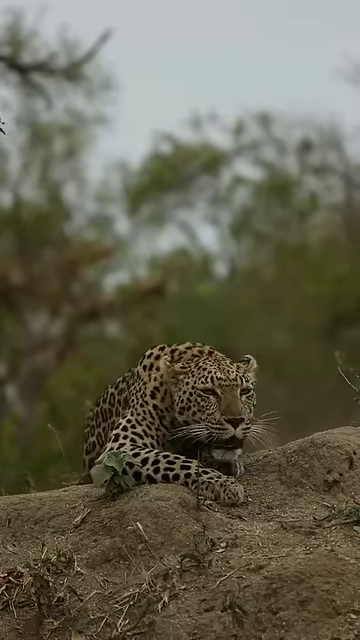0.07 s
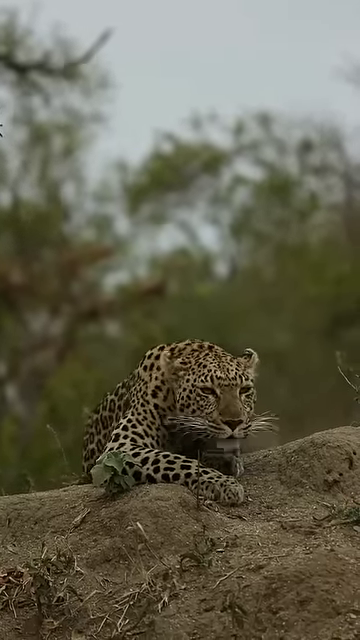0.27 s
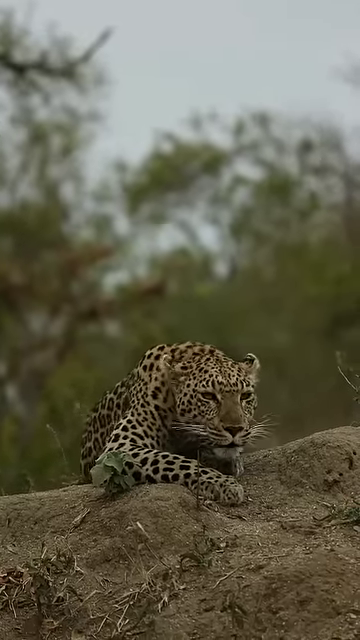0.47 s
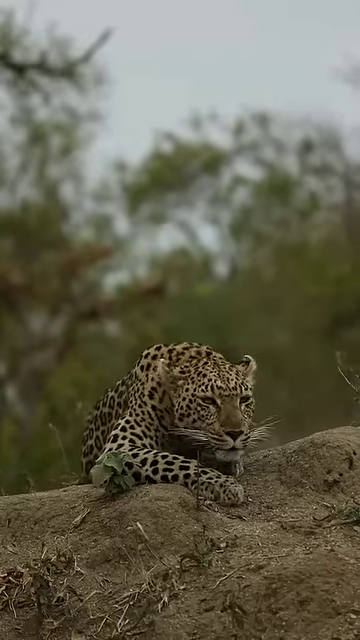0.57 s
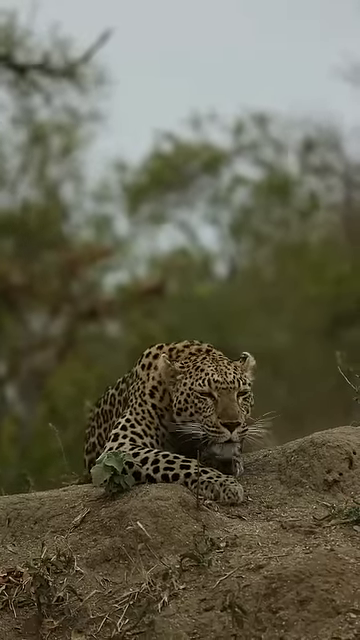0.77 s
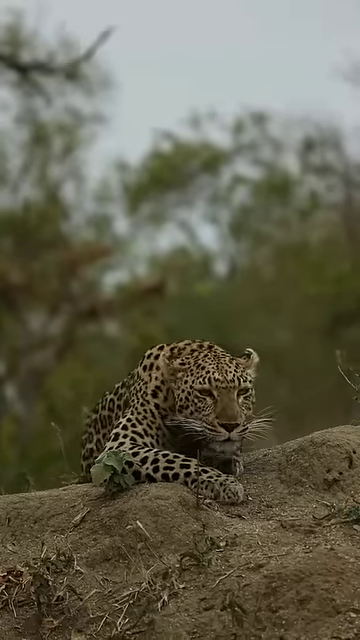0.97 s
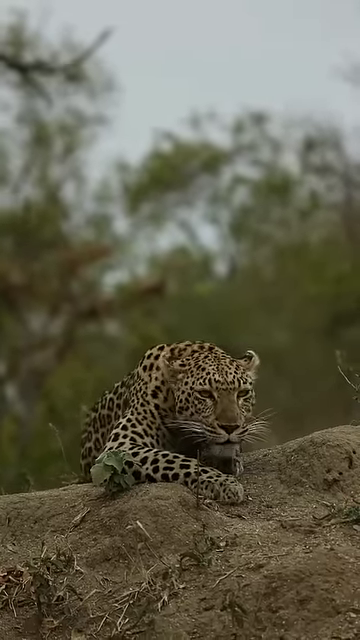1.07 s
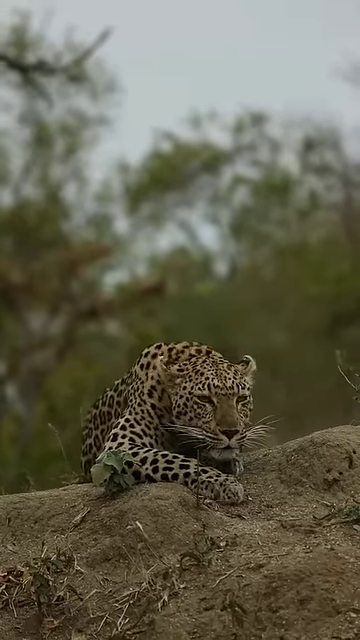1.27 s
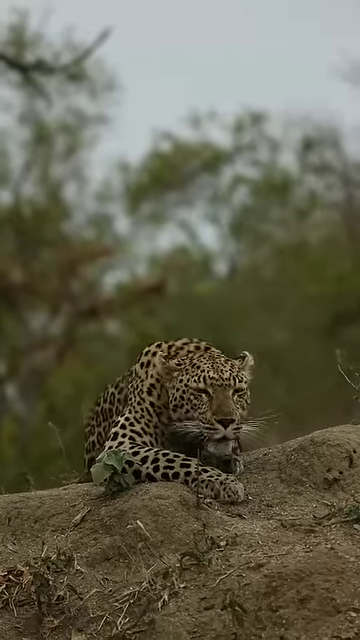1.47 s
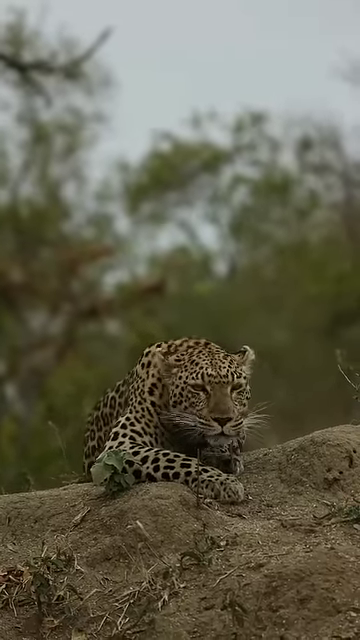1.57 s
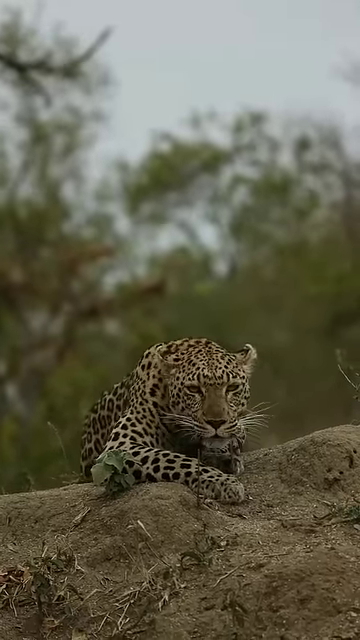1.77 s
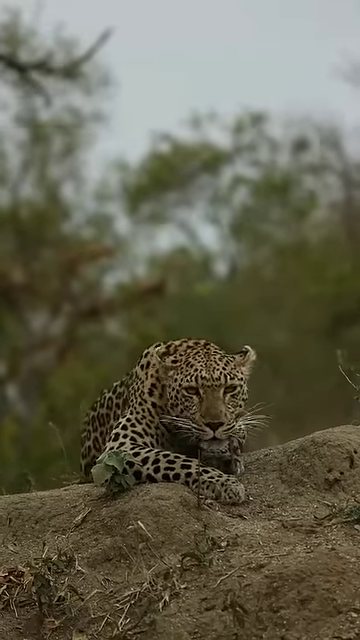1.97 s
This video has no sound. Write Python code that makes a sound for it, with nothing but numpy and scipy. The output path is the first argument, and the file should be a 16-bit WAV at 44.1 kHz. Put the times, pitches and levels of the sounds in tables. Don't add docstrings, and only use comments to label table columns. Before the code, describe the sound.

Close, dry outdoor sound of a leopard sawing: short grunt, coarse throaty out-breath, three times over. A sharp twig snap follows the first call, soft shutter strokes come after the second, over low air hiss and slight wind.

```python
import sys
import numpy as np
from scipy import signal
from scipy.fft import rfft, irfft, next_fast_len
from scipy.io import wavfile
from scipy.ndimage import uniform_filter1d, map_coordinates

SR = 44100
rng = np.random.default_rng(int(sys.argv[2]) if len(sys.argv) > 2 else 0)


def voltage_ratio(level):
    return 10 ** (np.asarray(level, float) / 20)


def digitize_waveform(pressure):
    field = np.atleast_2d(pressure).T
    bounded = np.clip(field, -1, 1)
    quanta = np.round(bounded * 32767).astype(np.int16)
    wavfile.write(sys.argv[1], SR, quanta)


N = 88200


def unit(x):
    return x / np.sqrt(np.mean(np.abs(x) ** 2) + 1e-20)


def along(points, hz):
    f, v = np.transpose(points)
    return np.interp(np.log(hz + 1), np.log(f + 1), v)


def filtered(x, response):
    m = next_fast_len(N + SR // 2)
    return irfft(rfft(x, m) * response(np.fft.rfftfreq(m, 1 / SR)), m)[..., :N]


def two_pole(f, time_s):
    return 1 / (1 + 2j * np.pi * f * time_s) ** 2


def wobble(rate):
    knots = rng.standard_normal(int(N * rate / SR) + 4)
    return map_coordinates(knots, [np.arange(N) * rate / SR])


def steady(x):
    return x / np.sqrt(np.abs(uniform_filter1d(x ** 2, round(0.035 * SR))) + 1e-3)


def patchy(x, patchy_db):
    z = signal.stft(x, nperseg=512)[2]
    field = uniform_filter1d(rng.standard_normal(z.shape[-2:]), size=5, axis=0)
    field = uniform_filter1d(field, size=5, axis=1)
    return signal.istft(z * voltage_ratio(patchy_db * unit(field)), nperseg=512)[1][..., :N]


def resonance(x, hz, width_hz):
    turn = np.exp(2j * np.pi * np.cumsum(hz * np.ones(N)) / SR)
    pole = np.exp(-np.pi * abs(width_hz) / SR)
    smooth = signal.lfilter([1], [1, -2 * pole, pole ** 2], x / turn)
    return unit(np.real(turn * smooth))


def hiss(spectrum, alike, patchy_db):
    pair = patchy(rng.standard_normal((2, N)), patchy_db)

    def mid_side(hz):
        turn = np.arccos(np.clip(along(alike, hz), -1, 1)) / 2
        return voltage_ratio(along(spectrum, hz)) * [np.cos(turn), np.sin(turn)]

    mid, side = filtered(pair, mid_side)
    return unit(np.array([mid + side, mid - side]))


def air():
    # f/Hz, level/dB
    spectrum = [(30, -5), (100, 3.5), (250, 2.5), (500, 3), (850, -2), (1300, -9.5), (4000, -18.5),
                (15700, -28)]
    # f/Hz, left-right likeness
    likeness = [(100, 0.97), (700, 0.79), (2000, 0.13), (10000, 0.051)]
    # t/s, half length/s, level/dB
    wind_puffs = [
        (1.045, 0.014, -38),
        (1.084, 0.029, -31),
        (1.383, 0.052, -47),
        (1.45, 0.039, -38),
        (0.044, 0.17, -44.5),
        (.7, 0.031, -61),
        (1.799, 0.018, -44),
        (1.94, 0.028, -65),
    ]
    t = np.arange(N) / SR
    swell = sum(voltage_ratio(db) * np.exp(-((t - s) / half_s) ** 2) for s, half_s, db in wind_puffs)
    white = rng.standard_normal((2, N))
    rumble = unit(filtered(white, lambda f: f ** 2 / (1 + (f / 83) ** 5)))
    level = voltage_ratio(-46 + 1.1 * wobble(6.05))
    return level * hiss(spectrum, likeness, patchy_db=0.4) + swell * rumble


def fold_slaps(rate, slap_s):
    jitter_cycles, scatter_db = 0.04065, 4
    cycles = np.cumsum(rate) / SR
    cycles = cycles - np.interp(slap_s, np.arange(N) / SR, cycles)
    chance = rng.standard_normal((200, 2))
    due = np.arange(-100, 100) + jitter_cycles * chance[:, 0]
    at = np.interp(due, cycles, np.arange(N), left=N, right=N).astype(int)
    return np.bincount(at, voltage_ratio(scatter_db * chance[:, 1]), N + 1)[:N], cycles


def mouth_rasp(slaps, puffs):
    # f/Hz, width/Hz, level/dB
    upper_modes = [(1250, 400, -7), (1570, 150, -5), (1850, 400, -7), (2290, 400, -8), (2780, 300, -9),
                   (3350, 450, -8), (4000, 700, -16), (4750, 500, -15), (5400, 600, -15), (6050, 600, -14),
                   (7000, 900, -22), (8200, 1000, -19), (9300, 800, -26), (12800, 2500, -33)]
    breath_share, sway_depth = 0.77, 0.06

    def mouth(f):
        return sum((-1) ** k * voltage_ratio(db) * 1j * f * w / (c * c - f * f + 1j * f * w)
                   for k, (c, w, db) in enumerate(upper_modes))

    sharp = unit(filtered(slaps, lambda f: 1j * f * (f < 5000)))
    rasp = patchy((1 - breath_share) * sharp + breath_share * puffs, patchy_db=2.5)
    sway = np.clip(wobble(35), -1, 1)
    swaying = 0
    for k in (-1, 0, 1):
        shaped = filtered(rasp, lambda f: mouth(f * (1 + k * sway_depth)))
        swaying = swaying + np.maximum(1 - np.abs(sway - k), 0) * shaped
    return steady(unit(swaying))


def breath(rows, slap_s, width_hz, upper_db, rise_db, nose_db):
    t = np.arange(N) / SR
    s, *cols = np.transpose(rows)
    effort_db, first_hz, rate = [np.interp(t, s, c) for c in cols]
    effort_db = effort_db - 600 * np.maximum(np.maximum(s[0] - t, t - s[-1]), 0)
    over_db = effort_db + 8.5
    late_s = t - s.mean()

    impulses, cycles = fold_slaps(rate, slap_s)
    gate = unit(filtered(impulses, lambda f: two_pole(f, 0.0071))) + 0.3
    rasp_gate = 0.9 + unit(filtered(impulses, lambda f: two_pole(f, 0.0038)))
    puffs = unit(rng.standard_normal(N) * rasp_gate)
    noise = [unit(gate * n) for n in rng.standard_normal((3, N))]
    slaps = unit(filtered(impulses, lambda f: 1j * f * two_pole(f, 0.0018)))

    def ring(hz, width, share, n):
        return steady((1 - share) * resonance(slaps, hz, width) + share * resonance(n, hz, width))

    from_slap = np.minimum(cycles % 1, 1 - cycles % 1)
    depth = np.clip(0.45 + 0.6 * wobble(40.17), 0, 1)
    leak = 1 - depth * np.exp(-(from_slap / 0.16) ** 2)
    low = steady(leak * ring(first_hz, width_hz, 0.3, noise[0]))
    low = low + voltage_ratio(-13.5) * ring(104, 29.6, 0.34, noise[0])
    low = low + voltage_ratio(nose_db) * ring(1720, 600, 0.62, noise[2])
    low = low + voltage_ratio(-27) * ring(399, 130, 0.44, noise[2])

    second_hz = 708 + 0.93 * (first_hz - 200) + 40 * wobble(30.95)
    second = ring(second_hz, 90, 0.6, noise[1])
    second = second + voltage_ratio(0.5) * ring(710 + first_hz - 200, 200, 0.6, noise[0])
    second_db = -13.5 - 12.0 + 1.68 * over_db - 8 * late_s + 1.83 * wobble(34.97)
    third = ring(1133.7, 44, 0.62, noise[2])
    third_db = -39 + 1.6 * over_db

    tongue_db = -9 + 4 * wobble(60.2)
    tongue = ring(2767 + 70 * wobble(29.7), 190, 0.68, noise[1])
    upper = mouth_rasp(slaps, puffs) + voltage_ratio(tongue_db) * tongue
    upper_db = upper_db - 11.0 + 0.94 * over_db + rise_db * late_s + 1.67 * wobble(24.46)
    return voltage_ratio(effort_db) * low + voltage_ratio(second_db) * second + voltage_ratio(third_db) * third + voltage_ratio(upper_db) * upper


def smacks():
    # t/s, peak level/dB, f/Hz
    wet_smacks = [(0.204, -22.5, 1690), (0.225, -26, 1600), (.228, -29, 3250), (0.036, -35, 2820),
                  (.264, -20.5, 2760), (.284, -27, 3140), (.302, -24, 2820), (.321, -16.5, 2790),
                  (.343, -28, 2720), (.345, -38, 4900), (0.881, -30, 3000), (.883, -29.5, 5810),
                  (0.901, -36, 3120), (0.962, -29, 2750), (0.999, -33, 2700), (1.08, -33, 2780),
                  (1.57, -32.5, 5570), (1.589, -29.5, 2370), (1.608, -32, 3490), (1.650, -23, 2650),
                  (1.651, -37, 5830), (1.673, -20, 2826), (1.697, -30.5, 4820), (1.738, -29, 2880),
                  (1.758, -36.5, 2840), (1.78, -39, 2840), (1.801, -41.5, 2860)]
    t60_s, rise_s, spread_share = 0.018, 0.0014, 0.07
    out, t = np.zeros(N), np.arange(1500) / SR
    chance = rng.standard_normal((len(wet_smacks), 2, 3, 1))
    for (s, db, hz), (spread, phase) in zip(wet_smacks, chance):
        ring = np.sin(2 * np.pi * hz * (1 + spread_share * spread) * t + 2 * phase).sum(axis=0)
        decay = voltage_ratio(db - 3.5 - 60 * t / t60_s)
        out[round(s * SR):][:1500] += decay * (1 - np.exp(-t / rise_s)) * ring
    return out


def leopard():
    # t/s, effort level/dB, lowest throat resonance f/Hz, fold slaps per s
    gasps = [
        [(0.0, -27, 170, 64), (0.056, -24.5, 161, 65.4), (0.07, -35, 148, 60), (0.1, -45.5, 173, 68)],
        [(0.62, -46, 174, 60), (0.654, -26, 169, 56.7), (0.682, -21.5, 150, 57.3), (0.77, -49.5, 158, 61)],
        [(1.31, -50, 156, 60), (1.322, -31.5, 159, 60), (1.372, -24, 149, 60), (1.44, -49, 164, 57)],
    ]
    # t/s, effort level/dB, lowest throat resonance f/Hz, fold slaps per s
    saws = [
        [(.141, -49, 149, 48.2), (.179, -26, 157, 47.6), (.201, -12, 170.5, 49.2), (.225, -6.5, 184, 50.4),
         (.273, -9, 256, 49.9), (.311, -8.5, 208.3, 48), (.361, -11.5, 177.4, 47), (.411, -23, 159, 44.5),
         (.481, -47.5, 156, 43)],
        [(.801, -51, 151, 45.2), (.839, -23, 143.5, 42.8), (.887, -5.5, 181, 52), (.926, -9.5, 240, 56.4),
         (.961, -8, 214.6, 51.2), (1.006, -10.5, 177.4, 38.6), (1.041, -19, 154.4, 51),
         (1.096, -25.5, 163.6, 46), (1.126, -70, 152, 59)],
        [(1.511, -75, 150, 40), (1.536, -24, 167, 43.6), (1.566, -15.5, 156.3, 47.2),
         (1.589, -9.5, 207.7, 51.5), (1.641, -7, 199.5, 49), (1.716, -12.5, 169, 38.8),
         (1.749, -21.5, 152, 39.8), (1.811, -31, 149.7, 38.7), (1.856, -69, 148, 66)],
    ]
    # f/Hz, left-right level/dB
    lean = [(60, 2), (200, -0.2), (700, -1.5), (1300, -3.5), (2400, -15.5), (4400, -0.5), (8000, -5),
            (15000, 1.5)]
    # f/Hz, left-right phase/rad
    lead = [(200, -.15), (700, -.25), (1300, -1.3), (2600, -1.4), (5000, -1.7), (9000, -.9), (14000, -1)]
    # f/Hz, T60/s
    bush_t60 = [(150, .2), (1000, .12), (2500, .07), (6000, .065)]
    # f/Hz, level/dB
    bush_db = [(150, -27.5), (800, -19), (2500, -3.5), (5000, 5), (10000, 4.5)]

    first_slap_s = (0.161, 0.822, 1.522, 0.0029, 0.631, 1)
    width_hz = (40, 40, 40, 114, 114, 114)
    upper_db = (-26, -28.5, -29, -28, -34.5, -39)
    rise_db = (8, -9, 1.5, -27, -3, -8)
    nose_db = (-60, -60, -60, -21, -32.5, -28)
    breaths = zip(saws + gasps, first_slap_s, width_hz, upper_db, rise_db, nose_db)
    voice = sum(breath(*b) for b in breaths) + smacks()
    voice = filtered(voice, lambda f: (1j * f / (77.3 + 1j * f)) ** 2)

    def ports(f):
        half = voltage_ratio(along(lean, f) / 2) * np.exp(0.5j * along(lead, f))
        return np.array([half, 1 / half])

    hz, t, z = signal.stft(rng.standard_normal((2, SR // 3)), SR, nperseg=256)
    decay = voltage_ratio(-60 * t / along(bush_t60, hz)[:, None])
    tail = signal.istft(z * decay, SR, nperseg=256)[1]
    wet = signal.fftconvolve(voice[None], tail / np.linalg.norm(tail[0]), axes=1)[:, :N]
    wet = filtered(wet, lambda f: voltage_ratio(along(bush_db, f)) * np.abs(ports(f)))
    return filtered(voice, ports) + wet


def ticks():
    # t/s, peak level/dB, f/Hz, left-right level/dB
    tick_rows = [(0.3752, -20, 3450, -13), (0.377, -8.5, 2670, -4.5), (.378, -26.5, 3900, -2),
                 (.4475, -23, 4270, -5.5), (.447, -27, 2040, 16), (.448, -33.5, 6300, 0),
                 (0.447, -40.5, 8500, -2), (.448, -33.5, 1300, -0.5), (.448, -36.5, 3100, 0),
                 (1.118, -47, 3900, -6), (1.206, -40.5, 4330, -12), (1.287, -38, 3450, -4),
                 (1.313, -40.5, 2830, -1), (1.324, -33.5, 5000, 4.5), (1.325, -35.5, 6500, 0),
                 (.713, -41.5, 700, 0), (1.8, -36.5, 900, -1)]
    t60_s, rise_s, snap_db, snap_t60_s = 0.01, 0.0006, -19, 0.005
    out, t = np.zeros((2, N)), np.arange(900) / SR
    port_phase = np.array([[0], [2.2]])
    for s, db, hz, pan_db in tick_rows:
        ring = np.sin(2 * np.pi * hz * t + port_phase) * voltage_ratio(-60 * t / t60_s) * (1 - np.exp(-t / rise_s))
        snap = voltage_ratio(snap_db - 60 * t / snap_t60_s) * np.diff(rng.standard_normal((2, 901)))
        level = voltage_ratio(db + np.array([[pan_db], [-pan_db]]) / 2)
        out[:, round(s * SR):][:, :900] += level * (ring + snap)
    return out


def shutter():
    # t/s, level/dB, length/s
    stroke_rows = [
        (1.108, -49.5, 0.052),
        (1.192, -49.5, 0.071),
        (1.277, -45.5, 0.081),
    ]
    # f/Hz, level/dB
    tone = [(210, -48), (350, -10), (1040, 3), (2070, -3.5), (3020, -18), (4260, -16.5), (9970, -29),
            (15000, -32)]
    whirr_on_s, whirr_off_s = 1.04, 1.41
    t = np.arange(N) / SR

    def clack(s, db):
        return voltage_ratio(db - 60 * np.maximum(t - s, 0) / 0.024) * np.clip((t - s) / 0.0058, 0, 1)

    strokes = 0
    for s, db, long_s in stroke_rows:
        run = np.clip(np.minimum(t - s, s + long_s - t) / 0.008, 0, 1)
        latch = clack(s + 0.0079, 17.5)
        stop = clack(s + long_s - 0.016, 12)
        strokes = strokes + voltage_ratio(db) * (run + clack(s, 14.5) + latch + stop)
    whirr = voltage_ratio(-54) * np.clip(np.minimum(t - whirr_on_s, whirr_off_s - t) / 0.025, 0, 1)
    rattle = voltage_ratio(1.3 * wobble(70.1))
    return (strokes + whirr) * rattle * hiss(tone, [(600, 1.0), (2500, 0.3)], patchy_db=2.0)


def scene():
    return air() + leopard() + ticks() + shutter()


def roll_off(x):
    return signal.sosfilt(signal.butter(12, 15770, fs=SR, output="sos"), x)


def record(dry):
    limited = dry / (1 + np.abs(dry / 0.95) ** 8) ** (1 / 8)
    mix = filtered(limited, lambda f: f < 15800)
    return roll_off(mix)


dry = scene()
out = record(dry)
digitize_waveform(out)
```